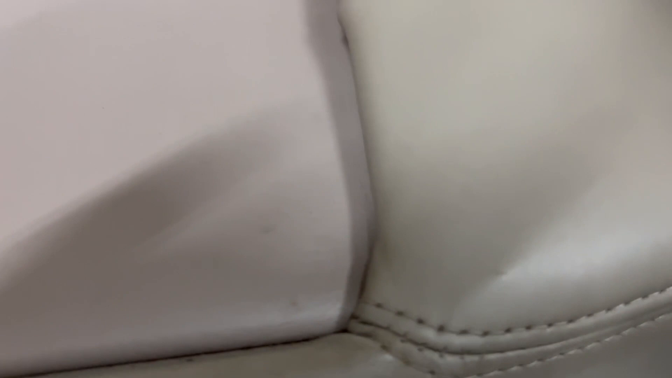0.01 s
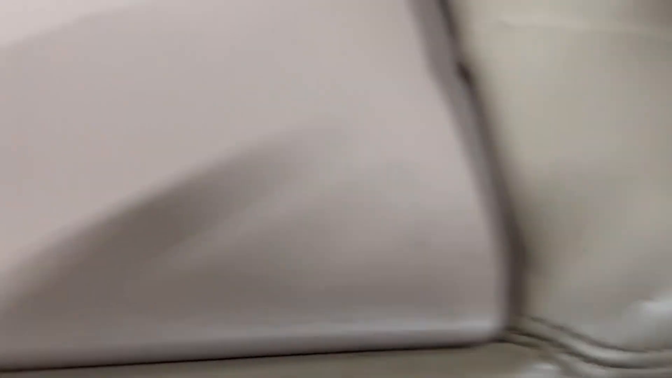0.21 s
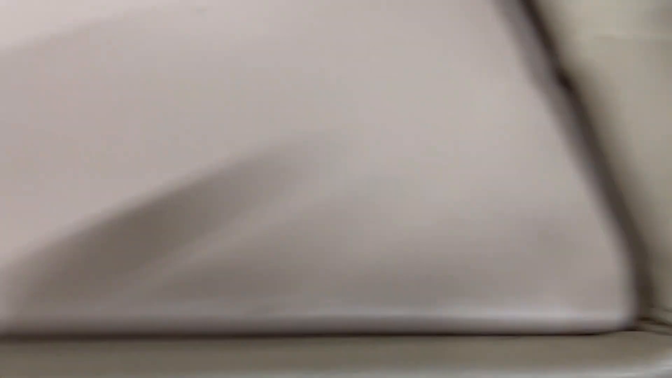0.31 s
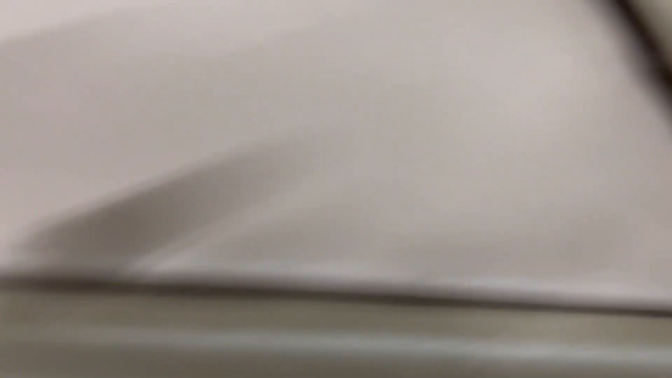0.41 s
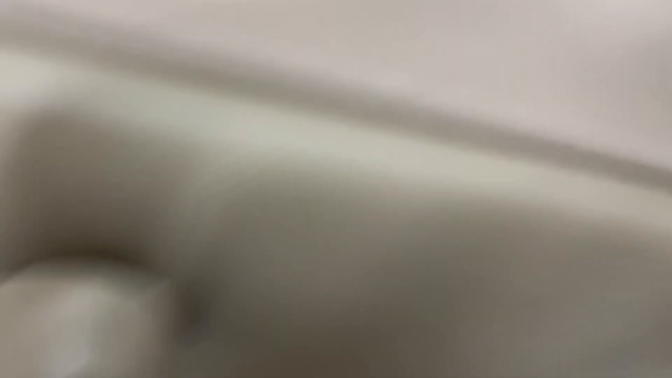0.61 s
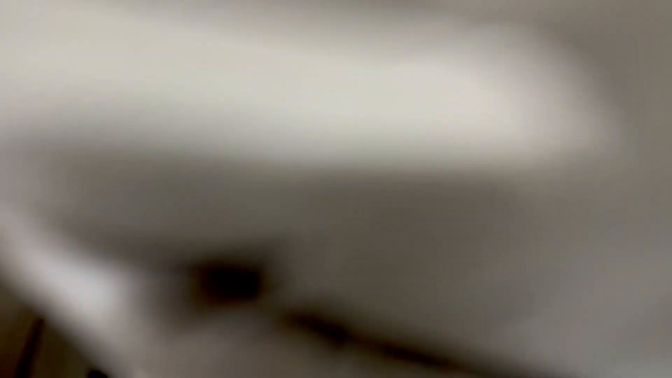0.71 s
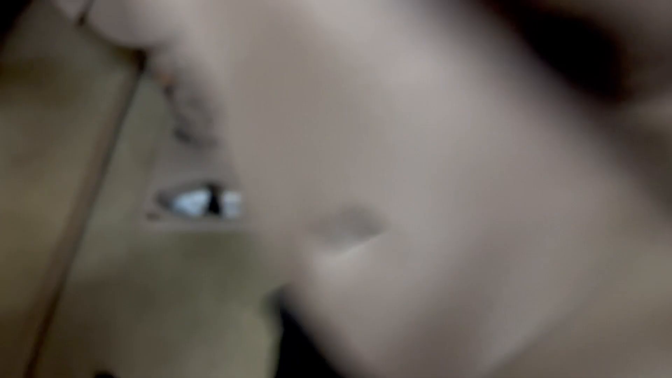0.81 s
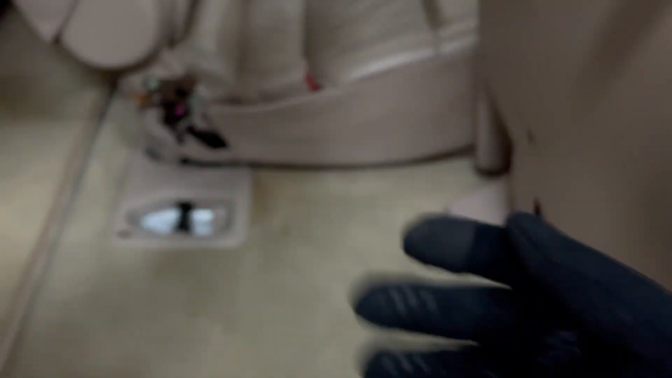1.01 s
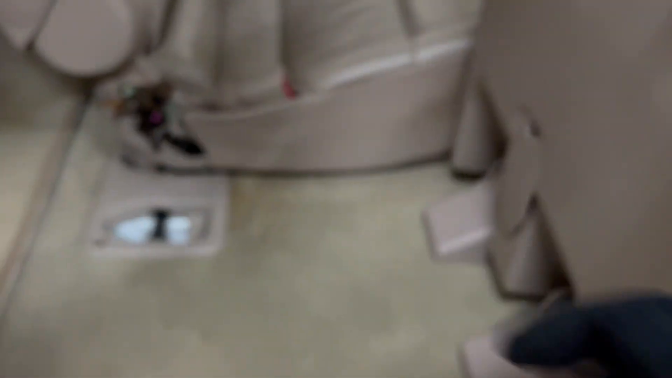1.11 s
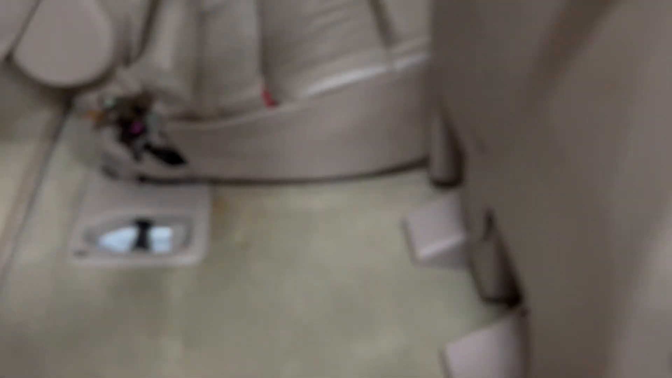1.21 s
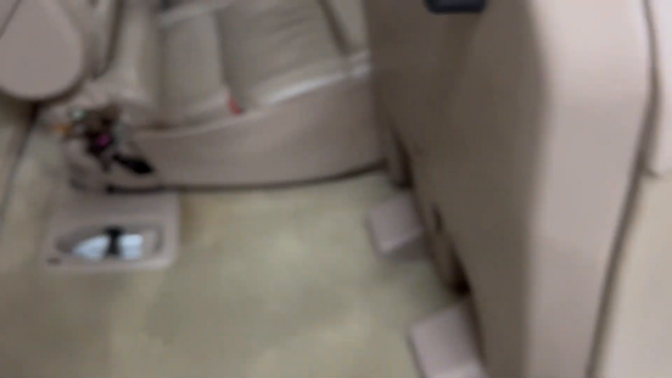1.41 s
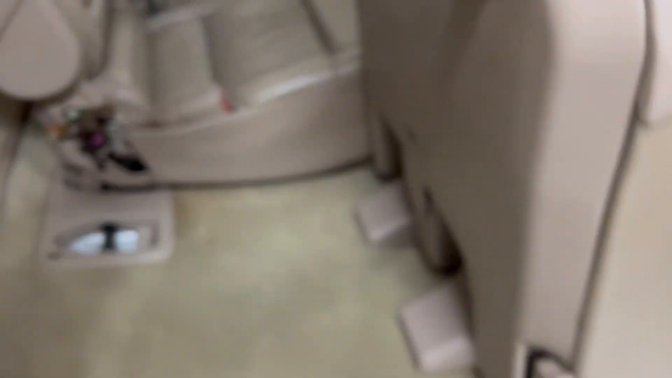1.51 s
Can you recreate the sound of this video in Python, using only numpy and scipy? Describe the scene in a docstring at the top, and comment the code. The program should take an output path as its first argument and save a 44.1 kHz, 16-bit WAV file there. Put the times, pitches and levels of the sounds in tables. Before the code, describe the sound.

A car's rear seat unlatches with a sharp double snap, rustles forward and lands with padded clunks

```python
"""Two sharp latch snaps and a thump, sliding cloth, then a padded clunk, knocks and low cabin rumble:
a rear seat is released and folded forward in a parked car, heard from close by.
Cracks, ticks, knocks and padded blows are coloured noise bursts; metal, seat back and floor pan
ring as decaying sines; flexing panels are falling tones; the upholstery is uneven noise,
the hinge creak pulsed noise and the cabin steady coloured noise under a level curve."""
import sys
import numpy as np
from scipy import signal
from scipy.fft import rfft, irfft
from scipy.io import wavfile
from scipy.ndimage import uniform_filter1d

SR = 44100
rng = np.random.default_rng(int(sys.argv[2]) if len(sys.argv) > 2 else 0)


def digitize_waveform(pressure):
    """Quantize a signal to 16-bit integers and store it at the path in sys.argv[1].

    Rows of a 2-D input are taken as channels; values are limited to [-1, 1].
    """
    field = np.atleast_2d(pressure).T
    bounded = np.clip(field, -1, 1)
    quanta = np.round(bounded * 32767).astype(np.int16)
    wavfile.write(sys.argv[1], SR, quanta)


N = 70560
T_S = np.arange(N) / SR
HZ = np.maximum(np.fft.rfftfreq(N, 1 / SR), 1)

# Every colour is a relative noise spectrum. Each row: frequency in Hz, density in dB per Hz.
# Every mode list is a set of resonances. Each row: frequency in Hz, relative level in dB, T60 in seconds.
# "Left" is the level of the left ear over the right, in dB.

# Latch snaps. Each row: start in seconds, crack level in dB, trim rattle in dB, metal ring in dB.
SNAPS = [(0.2221, -8, -18.5, -22.5), (0.2598, -16.5, -26, -32.5)]
# Colour of the crack.
CRACK_COLOUR = [(150, -4), (450, -10.5), (680, -5.5), (950, -6.5), (1280, 0), (1620, -12), (1950, -1),
                (2200, -11), (2600, -5), (3220, -9.5), (3650, -22), (4150, -6.5), (4760, -15.5),
                (6300, -17), (7770, -8), (10200, -25), (12200, -12.5), (17000, -32.5)]
CRACK_RISE_S, CRACK_HOLD_S, CRACK_T60_1KHZ_S = 0.00085, 0.002, 0.016
CRACK_T60_SLOPE = 0.086  # T60 falls as frequency to this power
# Colour of the rattling plastic trim.
TRIM_COLOUR = [(150, 5.5), (350, 0.5), (650, 0.5), (950, -6.5), (1300, -6.5), (1620, -10), (1950, 0),
               (2300, -9), (3200, -10.5), (4200, -13), (6000, -16), (7500, -10), (10000, -25),
               (12500, -18.5), (17000, -35)]
TRIM_T60_1KHZ_S, TRIM_T60_SLOPE = 0.15, 0.21
# Modes of the latch and its bracket.
LATCH_MODES = [(334.3, 0.5, 0.18), (696, -16, 0.11), (1220, -5, 0.065), (1354, 4.5, 0.03),
               (1821, -4, 0.092), (1969, 7, 0.079), (2116, -21, 0.24), (2304, -17.5, 0.17),
               (2623, -4.5, .06), (3190, -13, 0.26), (5098, -16, .084), (6315, -23.5, .04),
               (7860, -18.5, .08)]
CHATTER_DB, CHATTER_HZ = 2, 180  # loose metal chatters
# Modes of the seat back springing free.
BACK_MODES = [(92, -20.5, 0.2), (127.2, 1.5, 0.12), (144.4, -3, 0.16)]
RELEASE_S, RELEASE_DB, RELEASE_PUSH_S = 0.2358, -16.5, 0.0054

# Padded blows. Each row: start in seconds, level in dB, brightness in dB per octave, floor boom in dB.
LANDINGS = [(1.055, -33.5, -0.5, -42), (1.083, -20.5, -1, -30), (1.104, -23, -1, -16.5),
            (1.149, -30.5, -2, -17), (1.198, -32.5, 1, -41)]
# Colour of the padding.
PAD_COLOUR = [(60, -21), (160, 4.5), (300, -9.5), (450, -9.5), (750, -12), (1050, -22.5), (1500, -16),
              (2200, -33), (5000, -34), (16000, -66)]
PAD_RISE_S, PAD_T60_1KHZ_S, PAD_T60_SLOPE = 0.0033, 0.15, 0.35
# Modes of the seat on the floor pan.
PAN_MODES = [(39.9, -14.5, 0.74), (61, 1.5, 0.15), (75.4, -8.5, 0.62), (87.2, -8.5, .2), (154.6, -6, 0.15)]
PAN_PUSH_S = 0.0046

# Panel flexes. Each row: start in seconds, level in dB, starting pitch above the end pitch in Hz,
# seconds for that excess to halve, hold in seconds, left in dB.
FLEXES = [(0.2245, -21.5, 795, 0.0046, .006, -7), (0.302, -26, 1715, 0.0027, 0.0013, 10.5),
          (0.935, -34.5, 677, 0.0085, 0.012, 0), (1.0753, -19, 916, 0.00744, 0.0227, -1),
          (1.201, -21, 993, 0.00264, .003, 0)]
FLEX_END_HZ, FLEX_RISE_HALVINGS, FLEX_T60_S = 65.1, 1.32, 0.021
# An uneven panel scatters pitch excess and level.
FLEX_WOBBLE_OCTAVES, FLEX_ROUGH_DB, FLEX_ROUGH_HZ = 0.248, 2.5, 450

# Knocks of the frame on its stops. Each row: start in seconds, level in dB,
# brightness in dB per octave, left in dB.
KNOCKS = [(0.3024, -30, -1, 1.5), (0.935, -30, -0.5, 7), (1.0723, -22, 0.5, 0.5), (1.1989, -26, 3.5, 3.5)]
# Colour of a knock.
KNOCK_COLOUR = [(130, -4), (250, -1), (400, -5), (550, 4), (750, -10), (980, -5), (1500, -10),
                (2500, -19.5), (4000, -16.5), (7000, -51), (16000, -60)]
KNOCK_RISE_S, KNOCK_T60_1KHZ_S, KNOCK_T60_SLOPE = 0.00088, 0.06, 0.38
# Light linkage ticks. Each row: start in seconds, level in dB, brightness in dB per octave.
TICKS = [(0.052, -44.5, -6.5), (0.131, -49, -2), (0.179, -40, 9.5), (0.187, -40, 9), (0.209, -34.5, 4),
         (0.219, -28.5, 5), (0.3594, -39.5, -0.5), (0.392, -47.5, -0.5), (0.797, -47, -4.5),
         (0.868, -39, -1.5), (0.994, -41, 4), (1.138, -34.5, 0.5), (1.296, -46.5, -2), (1.590, -38, -2)]
# Colour of a tick.
TICK_COLOUR = [(150, 2), (600, 3.5), (1200, 5.5), (2100, 2.5), (3500, -7.5), (8000, -17), (16000, -29.5)]
TICK_RISE_S, TICK_T60_1KHZ_S = 0.001, 0.084

# Level of the sliding upholstery. Each row: time in seconds, level in dB.
SLIDE_LEVEL = [(0, -52.5), (.06, -52.5), (.10, -59.5), (.17, -54.5), (.33, -48), (.45, -51.5), (.54, -56),
               (.61, -52), (.68, -47), (.76, -43), (.91, -46), (.98, -43), (1.06, -41.5), (1.11, -35.5),
               (1.18, -41.5), (1.24, -44.5), (1.29, -55), (1.33, -53), (1.38, -63.5), (1.46, -58.5),
               (1.52, -53.5), (1.6, -51)]
# Colour of the sliding rustle.
SLIDE_COLOUR = [(140, 2), (230, -2), (320, -1), (430, 2), (620, -5), (1150, -6.5), (1750, -6.5),
                (2500, -13), (3600, -17.5), (9000, -21)]
# Level of the fine fabric hiss. Each row: time in seconds, level in dB.
HISS_LEVEL = [(0, -67), (.05, -69), (.10, -90), (.17, -57.5), (.40, -80), (.44, -58.5), (.53, -67),
              (.61, -61.5), (.69, -50.5), (.85, -55), (1.0, -48), (1.06, -49), (1.08, -33), (1.13, -53),
              (1.19, -50), (1.26, -65), (1.32, -60), (1.37, -81), (1.48, -93), (1.53, -68), (1.6, -52)]
# Colour of the hiss.
HISS_COLOUR = [(2500, -13.5), (5000, -7), (8300, -0.5), (10200, -15), (12300, 3), (14000, -11),
               (17000, -8.5)]
GRAIN_HZ, GRAIN_SPREAD_DB, FLICKER_DB = 2500, 2, 1.5

# Level of the hinge creak. Each row: time in seconds, level in dB.
CREAK_LEVEL = [(.66, -75), (.72, -58), (.80, -45.5), (.83, -54.5), (.86, -75)]
# Colour of the creak.
CREAK_COLOUR = [(700, -6), (1400, -3), (1900, 0), (2500, -16), (5000, -26)]
CREAK_HZ, CREAK_JITTER, CREAK_DECAY_CYCLES = 135, 0.06, 0.22

# Level of the cabin rumble. Each row: time in seconds, level in dB.
RUMBLE_LEVEL = [(0, -44), (.15, -45.5), (.3, -43.5), (.46, -44.5), (.6, -48), (.95, -48), (1.2, -37),
                (1.33, -41), (1.45, -46), (1.6, -45)]
# Colour of the rumble.
RUMBLE_COLOUR = [(20, -50), (40, -5), (72, -1), (105, -5.5), (150, -10), (230, -16.5), (500, -29.5),
                 (1500, -44), (16000, -63.5)]

SIDE_SHARE_MAX, SIDE_CORNER_HZ = 0.85, 620  # treble differs between the ears, bass does not
LATCH_LEFT_DB, LANDING_LEFT_DB, TICK_LEFT_DB = 2, 1, 2.5
SLIDE_LEFT_DB, HISS_LEFT_DB, CABIN_LEFT_DB = 4, 0.5, 1
EAR_SIGNS = np.array([[1], [-1]])  # left, right
LOW_CUT_HZ, TOP_CUT_HZ = 24, 16300


def latch():
    """Each snap is a hard crack, trim rattle and metal ring; the freed seat back thumps once."""
    crack = blow(0, CRACK_COLOUR, 0, CRACK_RISE_S, CRACK_T60_1KHZ_S, CRACK_T60_SLOPE, CRACK_HOLD_S)
    trim = blow(0, TRIM_COLOUR, 0, CRACK_HOLD_S, TRIM_T60_1KHZ_S, TRIM_T60_SLOPE)
    metal = ring(0, LATCH_MODES, CRACK_RISE_S) * amp(CHATTER_DB * walk(CHATTER_HZ))
    snaps = 0
    for start_s, crack_db, trim_db, metal_db in SNAPS:
        snap = amp(crack_db) * crack + amp(trim_db) * trim + amp(metal_db) * metal
        snaps = snaps + delay(snap, start_s)
    thump = amp(RELEASE_DB) * ring(RELEASE_S, BACK_MODES, RELEASE_PUSH_S)
    return pan(snaps + thump, LATCH_LEFT_DB)


def landing():
    """The cushion takes each blow as damped noise and the floor pan booms at its modes."""
    out = 0
    for start_s, pad_db, tilt_db, boom_db in LANDINGS:
        pad = blow(start_s, PAD_COLOUR, tilt_db, PAD_RISE_S, PAD_T60_1KHZ_S, PAD_T60_SLOPE)
        boom = ring(start_s, PAN_MODES, PAN_PUSH_S)
        out = out + amp(pad_db) * pad + amp(boom_db) * boom
    return pan(out, LANDING_LEFT_DB)


def panels():
    """Bending waves disperse, highs first, so each knock falls quickly in pitch."""
    out = 0
    for start_s, db, excess_hz, halving_s, hold_s, left_db in FLEXES:
        halvings = np.maximum(T_S - start_s, 0) / halving_s
        wobble_octaves = FLEX_WOBBLE_OCTAVES * walk(FLEX_ROUGH_HZ)
        pitch_hz = FLEX_END_HZ + excess_hz * 2 ** (-halvings + wobble_octaves)
        phase = 2 * np.pi * np.cumsum(pitch_hz * (T_S > start_s)) / SR
        ear_skew = np.arctan(side_share(pitch_hz)) * EAR_SIGNS
        wave = np.sin(phase + ear_skew) * amp(FLEX_ROUGH_DB * walk(FLEX_ROUGH_HZ))
        shape = envelope(start_s, FLEX_RISE_HALVINGS * halving_s, FLEX_T60_S, hold_s)
        out = out + amp(db) * pan(wave * shape, left_db)
    return out


def frame():
    """Linkage ticks and duller knocks on the stops, each a burst of damped noise."""
    ticks = 0
    for start_s, db, tilt_db in TICKS:
        tick = blow(start_s, TICK_COLOUR, tilt_db, TICK_RISE_S, TICK_T60_1KHZ_S, KNOCK_T60_SLOPE)
        ticks = ticks + amp(db) * tick
    knocks = 0
    for start_s, db, tilt_db, left_db in KNOCKS:
        knock = blow(start_s, KNOCK_COLOUR, tilt_db, KNOCK_RISE_S, KNOCK_T60_1KHZ_S, KNOCK_T60_SLOPE)
        knocks = knocks + amp(db) * pan(knock, left_db)
    return pan(ticks, TICK_LEFT_DB) + knocks


def upholstery():
    """Tiny slips of uneven strength make a rustle, with a smoother hiss on top."""
    slips = amp(GRAIN_SPREAD_DB * walk(GRAIN_HZ) + FLICKER_DB * walk(90))
    # each band flickers on its own
    rustle = sum(band * amp(FLICKER_DB * walk(25)) for _, band in bands(SLIDE_COLOUR, 0, slips))
    hiss = sum(band for _, band in bands(HISS_COLOUR, 0, np.sqrt(slips)))
    slide = pan(rustle * curve(SLIDE_LEVEL), SLIDE_LEFT_DB)
    return slide + pan(hiss * curve(HISS_LEVEL), HISS_LEFT_DB)


def hinge():
    """Stick-slip at a nearly even rate; each slip decays within its cycle."""
    rate_hz = CREAK_HZ * (1 + CREAK_JITTER * walk(20))
    cycle = np.cumsum(rate_hz) / SR % 1
    slips = np.exp(-cycle / CREAK_DECAY_CYCLES)
    creak = sum(band for _, band in bands(CREAK_COLOUR, 0, slips))
    swinging = (T_S > CREAK_LEVEL[0][0]) & (T_S < CREAK_LEVEL[-1][0])
    return pan(creak * curve(CREAK_LEVEL) * swinging, SLIDE_LEFT_DB)


def cabin():
    """Low-frequency noise in the car, following a level curve."""
    rumble = sum(band for _, band in bands(RUMBLE_COLOUR))
    return pan(curve(RUMBLE_LEVEL) * rumble, CABIN_LEFT_DB)


def blow(start_s, colour, tilt_db, rise_s, t60_1khz_s, t60_slope, hold_s=0):
    """Dense damped resonances as noise bands; T60 shortens toward the treble."""
    out = 0
    for hz, band in bands(colour, tilt_db):
        t60_s = t60_1khz_s * (hz / 1000) ** -t60_slope
        out = out + band * envelope(start_s, rise_s, t60_s, hold_s)
    return out


def ring(start_s, modes, push_s):
    """Decaying sines of a struck part; higher modes differ more in phase between the ears."""
    out = 0
    for hz, db, t60_s in modes:
        ear_skew = np.arctan(side_share(hz)) * rng.choice([-1, 1]) * EAR_SIGNS
        wave = np.sin(2 * np.pi * hz * (T_S - start_s) + ear_skew)
        out = out + amp(db) * envelope(start_s, push_s, t60_s) * wave
    return out


def bands(colour, tilt_db=0, drive=1):
    """Coloured stereo noise of rms 1 as overlapping bands half an octave apart: [(Hz, sound)]."""
    point_hz, point_db = np.array(colour).T
    octave = np.log2(HZ)
    gain = amp(np.interp(octave, np.log2(point_hz), point_db) + tilt_db * octave)
    # roll off beyond both ends of the colour
    gain = gain / np.hypot(1, (point_hz[0] / HZ) ** 4) / np.hypot(1, (HZ / point_hz[-1]) ** 8)
    mid, side = rfft(rng.standard_normal((2, N)) * drive)
    spectrum = gain * (mid + side_share(HZ) * side * EAR_SIGNS)
    spectrum = spectrum / np.sqrt(np.mean(irfft(spectrum, N) ** 2))
    split = []
    for centre in np.arange(4.5, 14.6, 0.5):  # octaves above 1 Hz
        weight = np.maximum(1 - 2 * abs(octave - centre), 0)
        split.append((2 ** centre, irfft(spectrum * weight, N)))
    return split


def envelope(start_s, rise_s, t60_s, hold_s=0):
    """Linear rise, hold and exponential decay."""
    age_s = T_S - start_s
    decay_age_s = np.maximum(age_s - rise_s - hold_s, 0)
    return np.clip(age_s / rise_s, 0, 1) * np.exp(-np.log(1000) * decay_age_s / t60_s)


def walk(rate_hz):
    """Smooth random drift of rms about 1, a new value rate_hz times a second."""
    step = int(SR / rate_hz)
    held = np.repeat(rng.standard_normal(N // step + 1), step)
    return unit(uniform_filter1d(held, step)[:N])


def side_share(hz):
    """Share by which the ears differ, rising with frequency."""
    return SIDE_SHARE_MAX * hz / np.hypot(hz, SIDE_CORNER_HZ)


def pan(x, left_db):
    """Raise the left ear over the right by left_db."""
    return x * amp(EAR_SIGNS * left_db / 2)


def delay(x, seconds):
    """Shift in time by a linear phase."""
    return irfft(rfft(x) * np.exp(-2j * np.pi * HZ * seconds), N)


def curve(rows):
    """Gain over time from (seconds, dB) points."""
    return amp(np.interp(T_S, *np.array(rows).T))


def amp(db):
    """Decibels to gain."""
    return 10 ** (np.asarray(db) / 20)


def unit(x):
    """Scale to rms 1."""
    return x / np.sqrt(np.mean(x ** 2))


def scene():
    """Sum of all sources, most set slightly to the left."""
    seat = latch() + landing() + panels() + frame()
    return seat + upholstery() + hinge() + cabin()


def record(dry):
    """Cut the deepest bass, round the peaks with tanh, cut the top steeply."""
    low_cut = signal.butter(2, LOW_CUT_HZ, "high", fs=SR, output="sos")
    top_cut = signal.ellip(8, 0.2, 70, TOP_CUT_HZ, fs=SR, output="sos")  # ripple, stopband in dB
    rounded = np.tanh(signal.sosfilt(low_cut, dry))
    return signal.sosfilt(top_cut, rounded)


dry = scene()
out = record(dry)
digitize_waveform(out)
```